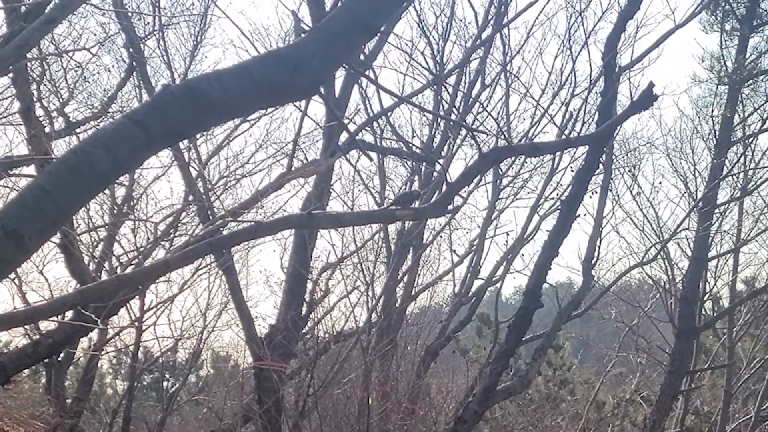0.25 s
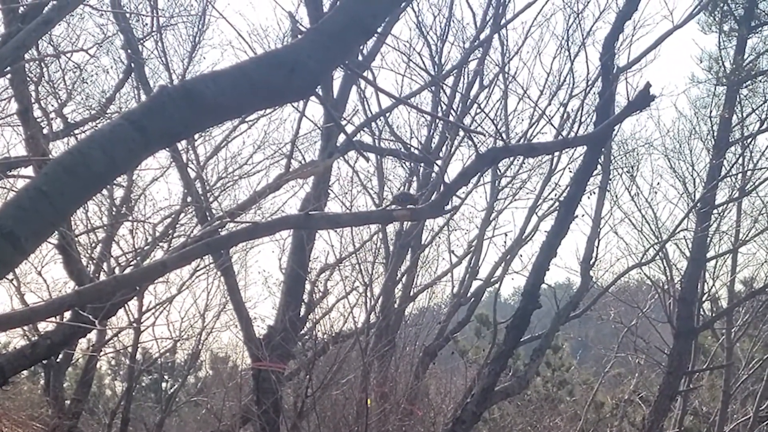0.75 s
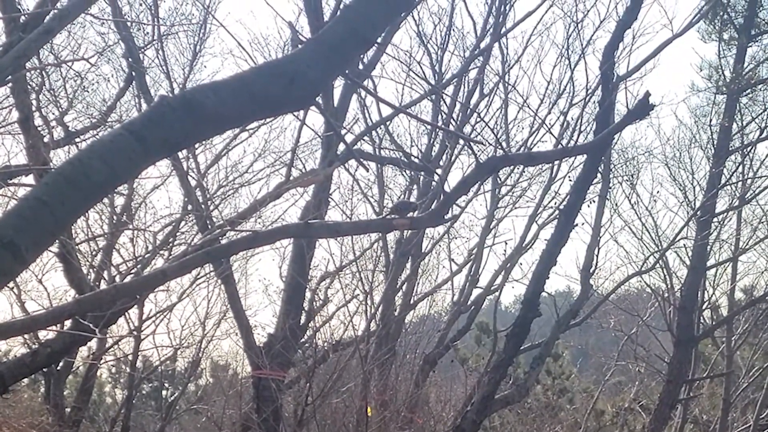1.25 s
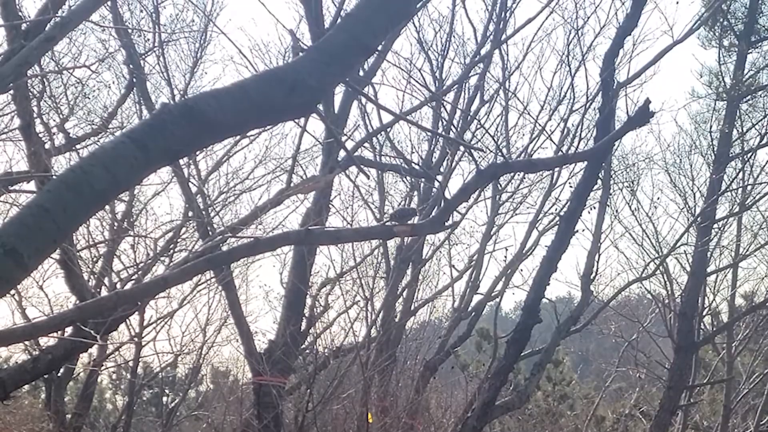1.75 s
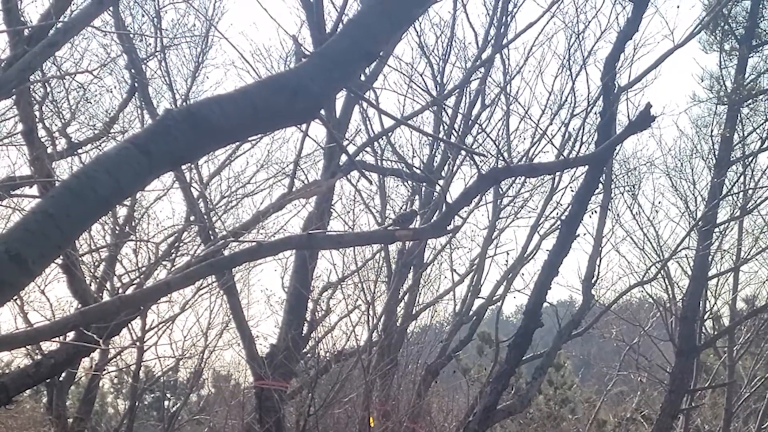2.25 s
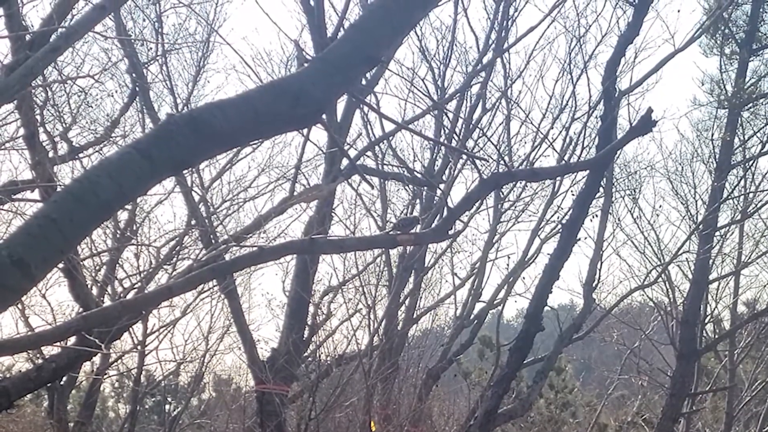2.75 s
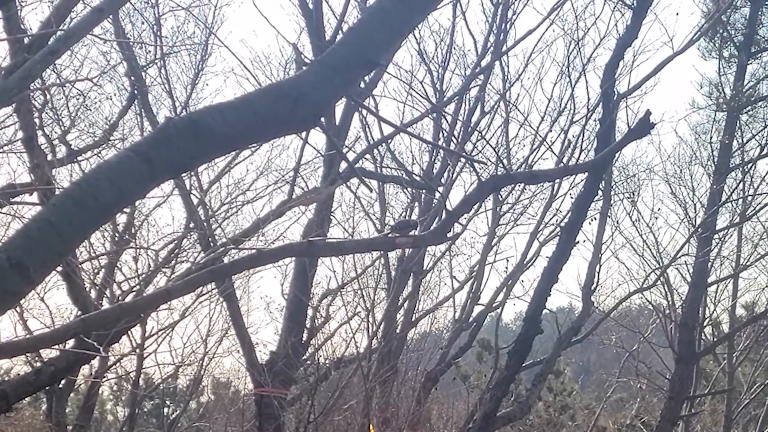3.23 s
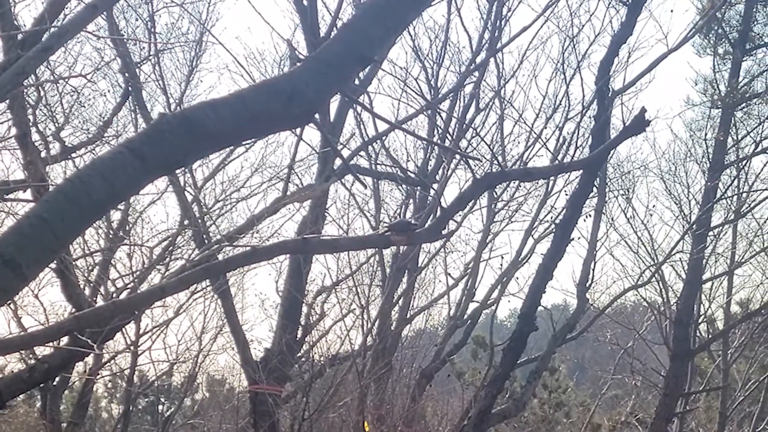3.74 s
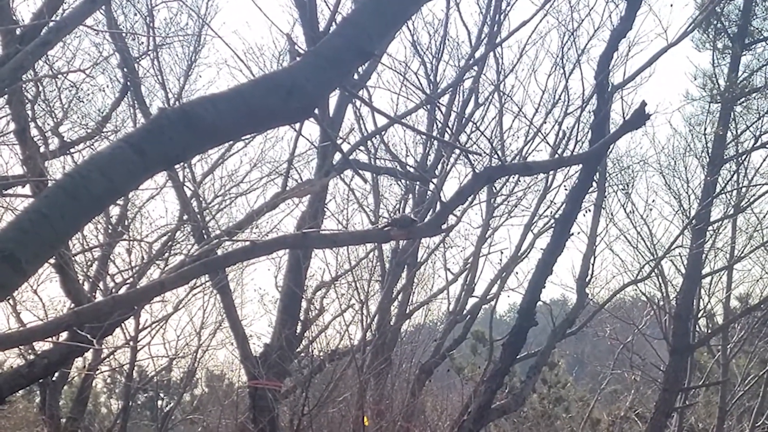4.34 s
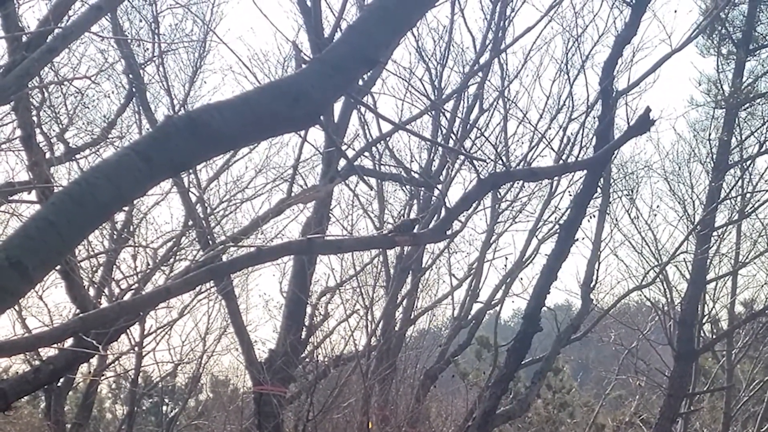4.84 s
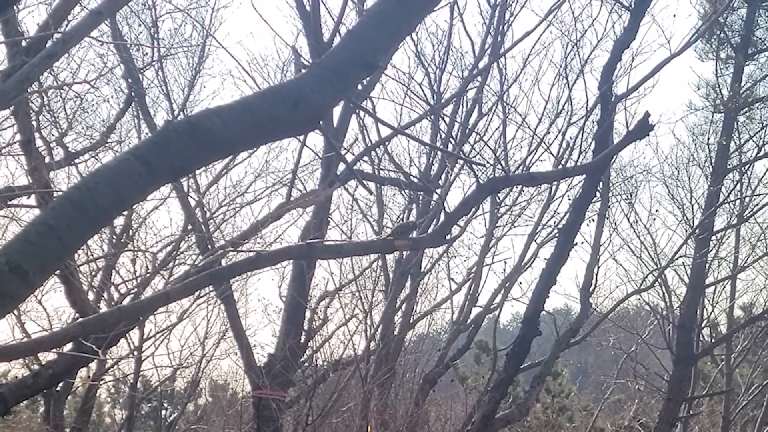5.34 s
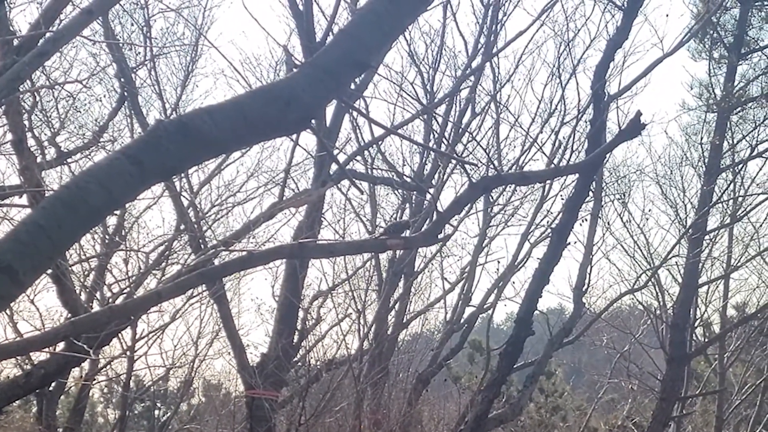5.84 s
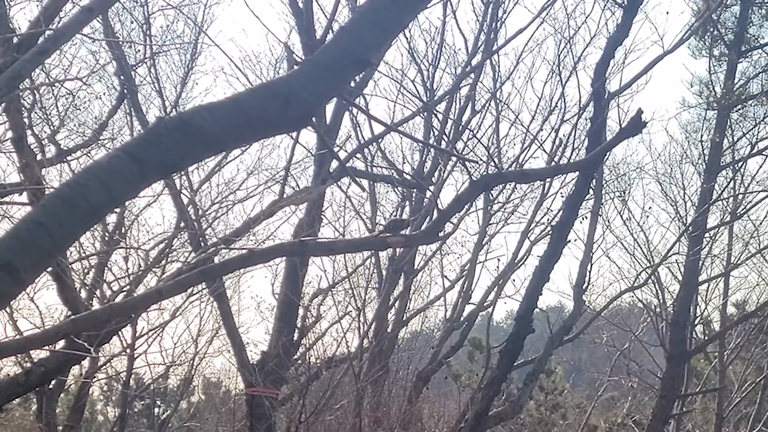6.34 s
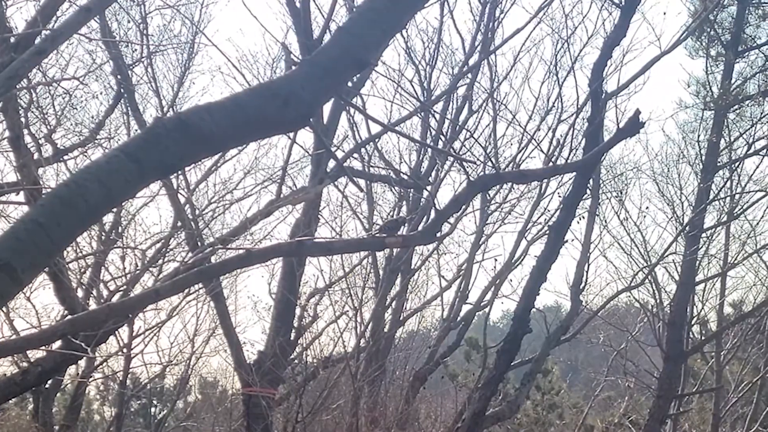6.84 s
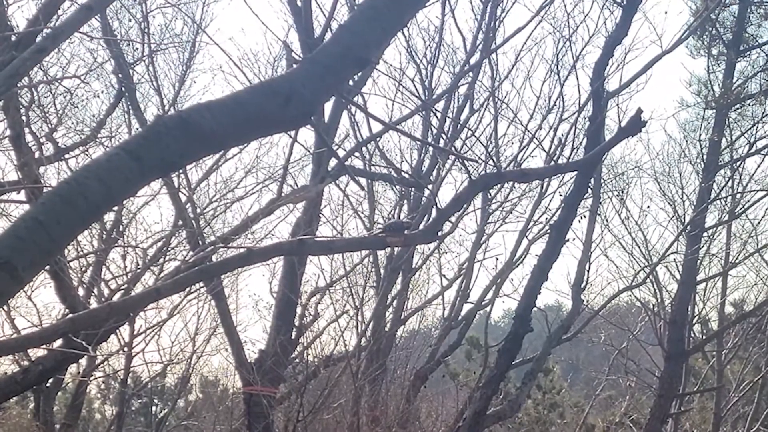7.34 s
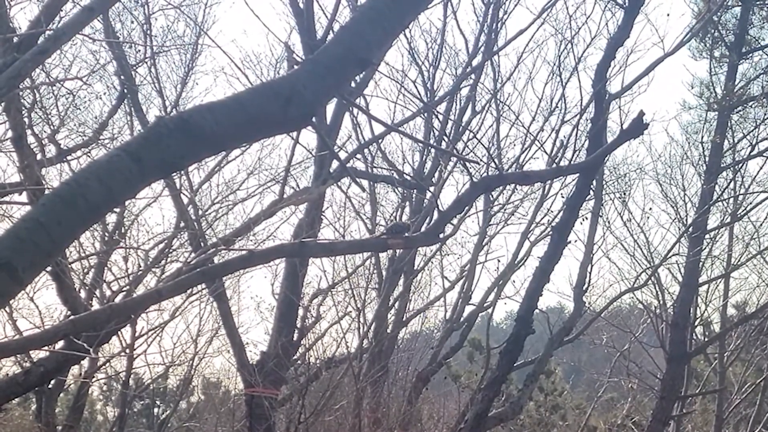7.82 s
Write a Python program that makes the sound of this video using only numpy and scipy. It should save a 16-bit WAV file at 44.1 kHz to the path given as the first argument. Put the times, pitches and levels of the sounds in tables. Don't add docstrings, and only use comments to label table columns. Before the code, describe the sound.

Dry, woody pecks come in little runs among bare trees, with low wind thumps on a hand-held phone and one faint far cheep.

```python
import sys
import numpy as np
from scipy import signal
from scipy.fft import rfft, irfft, next_fast_len
from scipy.io import wavfile
from scipy.ndimage import uniform_filter1d, map_coordinates

SR = 44100
rng = np.random.default_rng(int(sys.argv[2]) if len(sys.argv) > 2 else 0)


def generate_wav(signal):
    frames = np.transpose(np.atleast_2d(signal))
    scaled = np.clip(frames, -1, 1) * 32767
    pcm = np.round(scaled).astype(np.int16)
    wavfile.write(sys.argv[1], SR, pcm)


def gain_from_db(level_db):
    decades = np.asarray(level_db, float) / 20
    return 10 ** decades


N = 356328

BLOW_SIZE = 8192
BLOW_HZ = np.fft.rfftfreq(BLOW_SIZE, 1 / SR)


def unit(x):
    return x / np.sqrt(np.mean(x ** 2, axis=-1, keepdims=True) + 1e-20)


def along(points, hz):
    f, v = np.transpose(points)
    return np.interp(np.log(hz + 1), np.log(f + 1), v)


def curves(rows):
    s, *columns = np.transpose(rows)
    return [np.interp(np.arange(N) / SR, s, column) for column in columns]


def wobble(rate):
    steps = np.arange(0, N + 64, 64)
    knots = rng.standard_normal(int(N * 40 / SR) + 4)
    return np.interp(np.arange(N), steps, map_coordinates(knots, [steps * rate / SR]))


def panned(db):
    return gain_from_db(np.array([db / 2, -db / 2]))


def delayed(s):
    return np.exp(-2j * np.pi * BLOW_HZ * s)


def rush(spectrum, alike, sides, patchy_db=None):
    pair = rng.standard_normal((2, N + 512))
    if patchy_db:
        z = signal.stft(pair, nperseg=512)[2]
        field = uniform_filter1d(rng.standard_normal(z.shape[1:]), size=6, axis=0)
        field = uniform_filter1d(field, size=14, axis=1)
        pair = signal.istft(z * gain_from_db(patchy_db * field / field.std()), nperseg=512)[1]
    m = next_fast_len(N + 8192)
    hz = np.fft.rfftfreq(m, 1 / SR)
    turn = np.arccos(np.clip(along(alike, hz), -1, 1)) / 2
    mid, side = rfft(pair, m) * gain_from_db(along(spectrum, hz)) * [np.cos(turn), np.sin(turn)]
    out = irfft(np.array([mid + side, mid - side]) * panned(along(sides, hz)), m)[:, :N]
    return out / np.sqrt(np.mean(out ** 2))


def pecking():
    moves_s = [2.7, 4.85]
    # (time [s], ring level [dB], then over it: hollow knock [dB], upper ring
    # [dB], bite into the bark [dB])
    taps = [
        (0.152, -51.4, 12.1, 2.8, -6.4),
        (0.266, -38.4, 2.3, -5.6, -6.7),
        (0.5689, -39.8, 3.8, -3.8, -5.7),
        (0.6945, -35.0, 0.5, -2.8, -6.8),
        (0.8213, -34.1, 0.9, 0.7, -6.1),
        (1.2002, -46.2, 5.5, -3.9, -12.4),
        (1.3076, -38.4, 2.2, 1.1, -5.0),
        (1.4352, -38.5, 1.5, 0.5, -5.2),
        (1.6716, -40.4, -2.5, -5.1, -11.1),
        (1.7753, -46.2, -5.6, -2.2, -6.2),
            (3.717, -44.3, 2.9, -4.4, -4.0), (3.8182, -36.8, -1.5, -5.7, -5.5),
                  (3.923, -45.8, 1.6, -1.5, 4.7), (4.1888, -42.6, 2.3, -5.0, -4.1),
                  (4.2894, -37.8, -5.1, -4.1, -8.0), (4.3967, -37.9, -0.4, -0.5, -9.2),
                  (4.62, -53.2, 1.7, -13.4, -14.7), (4.7296, -54.7, -1.3, -11.8, -5.6),
                  (5.0006, -51.2, 5.4, -3.7, -9.9), (5.103, -39.5, 3.3, -2.1, -2.3),
                  (5.229, -40.0, -5.6, 1.7, -0.4), (5.474, -45.6, 6.6, -1.2, -1.7),
                  (5.582, -39.9, -3.0, 3.2, 0.7), (5.692, -50.0, -5.5, -1.1, -1.7),
                  (5.795, -63.0, -0.0, -1.4, -7.2), (6.0782, -50.5, 4.0, -4.5, -9.0),
                  (6.1765, -44.5, 2.3, -4.8, -5.1), (6.2814, -41.4, 4.6, 0.3, -1.0),
                  (6.3961, -40.4, 2.7, 0.4, -1.5), (6.6749, -40.4, -9.3, 4.7, 4.6),
                  (6.9822, -49.2, 5.0, -5.8, -9.1), (7.0863, -44.4, 6.0, 1.2, -0.3),
                  (7.196, -35.4, -7.0, -1.4, -6.2), (7.437, -62.1, 4.0, 3.0, 0.8),
                  (7.5268, -46.6, -10.3, 4.9, -1.6), (7.695, -62.0, 5.0, -11.2, -14.6)]
    # (time [s], lead of the left port [s], splinters over crack [dB])
    perch = [(0, 0.00021, -2), (2, .00019, -1), (3.5, 0.00011, -10.5), (4.5, .0001, -11.5),
             (5, .0001, -5.5), (6.3, 0.000098, -8), (6.7, .0001, -4), (8, 0.000091, -1)]
    crumble_db = -12, -10, -8, -4, -3
    out = np.zeros((2, N + BLOW_SIZE))
    echoes = nearby_copies()
    perch_s, leads, splinters_db = np.transpose(perch)
    push = delayed(0.000583) / (1 + 1j * BLOW_HZ / 7500) ** 2
    for s, db, knock_db, upper_db, bite_db in taps:
        spot = np.searchsorted(moves_s, s)
        splinter_db = bite_db + np.interp(s, perch_s, splinters_db)
        group_db = knock_db, 0, upper_db, bite_db, splinter_db
        crushed = crushed_bark()
        blow, spread = 0, 0
        for (modes, blurred), rel_db, rough_db in zip(branch_groups(spot), group_db, crumble_db):
            part = (push + gain_from_db(rough_db) * crushed) * modes
            blow = blow + gain_from_db(db + rel_db + 66) * part / np.linalg.norm(part)
            spread = spread + gain_from_db(db + rel_db + 51.5) * blurred / np.linalg.norm(blurred)
        ports = [delayed(0), delayed(np.interp(s, perch_s, leads))]
        heard = irfft(blow * ports * (1 + echoes[spot]), BLOW_SIZE)
        start = round((s - 0.0008) * SR)
        out[:, start:start + BLOW_SIZE] += heard + scattered(spread * delayed(0.006))
        lead_in = rfft(rng.standard_normal((2, 600)) * np.hanning(600), BLOW_SIZE)
        start = round((s - 0.012) * SR)
        out[:, start:start + BLOW_SIZE] += gain_from_db(-41 + 3 * rng.standard_normal()) * irfft(lead_in * spread, BLOW_SIZE)
    return out[:, :N]


def branch_groups(spot):
    # (frequency [Hz], width [Hz], left and right level [dB]
    wood = [(1232, 70, 12.0, 8.0, 13.0, 9.0, 11.0, 8.0), (1513, 70, -1.0, 2.0, -1.0, -2.0, -2.0, -2.0),
            (1608, 70, 2.0, 3.0, 6.0, 2.0, 2.0, 1.0), (1772, 70, -10.0, -16.0, -13.0, -14.0, -7.0, -14.0),
            (2241, 104, -14.0, 4.0, 0.0, 6.0, -8.0, 2.0), (2537, 70, -14.0, 2.0, -17.0, -8.0, -5.0, -0.0),
            (2780, 166, -3.0, 6.0, -7.0, -1.0, -6.0, -1.0), (3102, 83, -10.0, 0.0, -2.0, 0.0, -2.0, -6.0),
            (3412, 147, -9.0, -8.0, -6.0, -9.0, -6.0, -7.0),
            (3744, 147, -1.0, -2.0, -3.0, -8.0, -2.0, -6.0), (4015, 96, -4.0, -2.0, -2.0, -1.0, -2.0, -3.0),
            (4344, 400, -2.0, -4.0, -3.0, -5.0, -2.0, -3.0),
            (4556, 285, -7.0, -7.0, -10.0, 2.0, -11.0, 3.0),
            (4960, 400, -3.0, -8.0, -5.0, -5.0, -6.0, -2.0)]
    # (frequency [Hz], width [Hz], left and right level [dB]
    # at the first spot, left and right level [dB] at the second)
    loose_bark = [(5220, 480, -9, -5, -4, 5), (5940, 340, -15, -7, -12.5, 0.5), (6260, 270, -2, -6, 6, 2),
                  (7180, 250, -3, -7, -6.5, -7.5), (7860, 300, -11, -9.5, -16, -15),
                  (8980, 310, -3, 4, -11, -12), (9160, 360, 1, 6, -11, 0), (9900, 620, 0, 11, -3, 1),
                  (10640, 620, -5, 1, -9, 3.5), (11480, 460, -7, 0, -6.5, -6), (12060, 880, -9, 2, -6, -8),
                  (13400, 620, -10, -18, -8, -5), (14600, 730, -16, -21, -26, -13),
                  (15500, 730, -28, -31, -27, -20)]
    group_edges_hz = [1950, 3250, 4700, 8200]
    node_width_hz = 367, 10, 360
    f = BLOW_HZ
    branch = wood + [row + row[-2:] for row in loose_bark]
    centre, width, *port_db = np.transpose(branch)[:, :, None]
    group = np.searchsorted(group_edges_hz, centre[:, 0])
    sign = (-1.) ** (np.arange(len(branch)) + (group > 0))[:, None]

    def ring(c, w):
        return sign * 1j * f * w / (c * c - f * f + 1j * f * w)

    no_bass = (1j * f / (1000 + 1j * f)) ** 2
    node = 1 - 1j * f * node_width_hz[spot] / (1960 ** 2 - f * f + 1j * f * 380)
    thin = no_bass * node
    pitch_luck, level_luck = rng.standard_normal((2, len(branch), 1))
    gains = gain_from_db(np.array(port_db[2 * spot:2 * spot + 2]) + 1.8 * level_luck)
    modes = gains * ring(centre * (1 + 0.003 * pitch_luck), width) * thin
    blurred = gains.mean(0) * ring(centre, 4.5 * width) * thin
    return [(modes[:, group == g].sum(1), blurred[group == g].sum(0)) for g in range(5)]


def crushed_bark():
    t = np.arange(BLOW_SIZE) / SR
    burst = rng.standard_normal((3, BLOW_SIZE)) * gain_from_db(-60 * t / 0.0096) * (1 - np.exp(-t / 0.0011)) ** 2
    return rfft(burst[0] + 0.5 * burst[1:]) * 1j * BLOW_HZ / (5000 + 1j * BLOW_HZ)


def nearby_copies():
    # (delay [s], left level [dB], right level [dB])
    early = [(.0012, -22, -11.5), (.0021, -15, -13.5), (.0033, -24, -20), (.0051, -30, -17),
             (.0089, -23, -16), (0.0108, -22, -18), (0.012, -21, -30)]
    # (delay [s], left level [dB], right level [dB])
    ground_copies = [(.0073, -9, -10), (.0064, -8, -11), (.00641, -7.5, -10)]

    def copy(s, left_db, right_db):
        return gain_from_db(np.array([[left_db], [right_db]])) * delayed(s) / (1 + 1j * BLOW_HZ * s / 70)

    return [sum(copy(*row) for row in early + [ground]) for ground in ground_copies]


def scattered(spectrum):
    # (frequency [Hz], time to fall 60 dB [s])
    trunks = [(800, 0.038), (2500, 0.19), (6000, 0.16), (10000, 0.17), (15000, 0.15)]
    hz, t, z = signal.stft(rng.standard_normal((2, BLOW_SIZE - 1024)), SR, nperseg=256)
    tail = signal.istft(z * gain_from_db(-60 * t / along(trunks, hz)[:, None]), SR, nperseg=256)[1]
    return irfft(spectrum * rfft(tail / np.linalg.norm(tail[0]), BLOW_SIZE), BLOW_SIZE)


def ticks():
    # (time [s], peak level [dB], left-right difference [dB])
    crumbs = [(0.173, -62, -11), (1.3853, -58, -6), (1.951, -66, -2.0), (2.2094, -73, -0.5),
              (2.2593, -70, 3.0), (2.4857, -68, -1.0), (2.9157, -72, 3.0), (3.5603, -66, 6),
              (3.6252, -72, -0.5), (4.538, -66, 1.1), (5.4345, -67, 1.0), (7.6594, -71, 0.5)]
    out, t = np.zeros((2, N + 512)), np.arange(512) / SR
    band = signal.butter(2, [7500, 12000], "bandpass", fs=SR, output="sos")
    for s, db, side_db in crumbs:
        click = signal.sosfilt(band, rng.standard_normal(len(t)) * gain_from_db(-60 * t / 0.0071))
        start = round(s * SR)
        out[:, start:start + len(t)] += gain_from_db(db) * panned(side_db)[:, None] * click / np.abs(click).max()
    return out[:, :N]


def cheep():
    # (time [s], frequency [Hz], level [dB])
    note = [
        (1.63, 3250, -95),
        (1.64, 3240, -71),
        (1.666, 3170, -79),
        (1.676, 2940, -50),
        (1.686, 2524, -52),
        (1.698, 2395, -59),
        (1.712, 2460, -71),
        (1.722, 2480, -92),
    ]
    pulses_hz, rough_db = 85, 5
    hz, db = curves(note)
    trill = (1 + np.cos(2 * np.pi * pulses_hz * (np.arange(N) / SR - 1.684))) / 2
    hoarse_db = rough_db * unit(uniform_filter1d(rng.standard_normal(N), size=150))
    tone = np.sin(2 * np.pi * np.cumsum(hz) / SR)
    return panned(-1.8)[:, None] * gain_from_db(db + 2.5 + hoarse_db) * (0.25 + trill) * tone


def swells(rows, pan_share):
    rise_over_fall = 0.73
    steps = np.arange(0, N + 64, 64)
    s, fall_s, db, side_db = np.transpose(rows)[:, :, None]
    away = steps / SR - s
    drop_db = 10 * np.maximum(away, -away / rise_over_fall) / fall_s
    power = (panned(pan_share * side_db) * gain_from_db(db - drop_db)) ** 2
    return np.array([np.interp(np.arange(N), steps, port.sum(0)) for port in power])


def thumps():
    # (time [s], peak level [dB], frequency [Hz], left-right difference [dB])
    pushes = [
        (0.0414, -16.5, 71.5, 3),
        (0.043, -30, 190, 1.1),
        (6.638, -18, 77, -1),
        (6.628, -26, 190, .3),
        (7.165, -24, 110, 1.5),
        (6.805, -29, 90, 0),
        (6.84, -27, 85, 0),
        (7.065, -28, 95, 0),
        (7.258, -29, 105, 0),
    ]
    out, t = np.zeros((2, N)), np.arange(N) / SR
    for s, db, hz, side_db in pushes:
        cycles = (t - s) * hz
        pulse = -np.cos(2 * np.pi * cycles) * np.exp(-(cycles / 0.5) ** 2)
        out += gain_from_db(db) * panned(side_db)[:, None] * pulse
    return out


def wind():
    # (time [s], strength [dB])
    breeze = [(0, -47.5), (1, -48), (3, -48), (4.9, -48.5), (5.45, -51.5), (6.3, -51.5), (6.6, -46),
              (6.95, -40), (7.18, -46), (7.3, -51), (8.08, -50.5)]
    # (time [s], time to fall 10 dB [s], slow buffet [dB], faster buffet over it [dB],
    # left-right difference [dB])
    strong = [(0.04, 0.04, -29.5, -5.5, -10), (0.2, 0.08, -31, -13, 10), (0.54, 0.16, -34.5, -5.5, 10),
              (0.74, .03, -43, 6.5, 11), (0.94, 0.08, -35.5, -3.5, 5), (2.09, 0.2, -39, -4.5, -2),
              (2.65, 0.2, -41, -3, 2), (3.4, 0.15, -37, -10.5, 17), (3.96, 0.1, -44.5, 0.5, 4),
              (4.66, .06, -45.5, 4, -4), (5.04, 0.09, -39, -0.2, -22), (5.145, 0, -41, 3, 15),
              (5.22, .05, -43.5, 7, -9), (5.6, 0.05, -38, 4, -13), (5.67, 0.09, -36, -0.5, 7),
              (6.165, .05, -38, 2, -4), (6.41, 0.07, -38, -8, -14), (6.62, .07, -31.5, -1, 1),
              (6.82, .06, -37, 1, 1), (7.02, .06, -42, 8.5, 10), (7.16, 0.0653, -37, 11, -2),
              (7.28, 0.06, -40, 4, 12)]
    # (time [s], level [dB], left-right difference [dB])
    puffs = [(1.06, -34.5, 14), (1.28, -41, 18), (1.39, -41.5, -8), (1.55, -42.5, -3), (1.75, -41, -3),
             (1.91, -37.5, -7), (2.45, -42, -4), (3.05, -48, -2.1), (3.6, -39, 3), (4.32, -46, 17),
             (4.5, -42, 4), (4.77, -41, -8), (4.95, -36, -14), (5.3, -42, 0), (5.96, -43, 4),
             (6.48, -44, -6), (7.76, -38, -16), (7.92, -40, -11), (8.03, -36, -9)]
    # (frequency [Hz], density [dB per Hz])
    slow_spectrum = [(12, -44), (22, -14), (45, -0.5), (62, 4.5), (78, -2), (110, -35.5), (200, -64.5),
                     (400, -130)]
    # (frequency [Hz], density [dB per Hz])
    faster_spectrum = [(40, -40), (65, -7.5), (85, 5.5), (105, -2), (135, -8.5), (190, -20.5), (300, -63.5),
                       (600, -130)]
    # (frequency [Hz], density [dB per Hz])
    flutter_spectrum = [(60, -30), (120, 6), (180, 7), (260, -0.5), (400, -9.5), (700, -39), (1500, -130)]
    puff_s, puff_faster_db = 0.062, -12.5
    calm_slow_db, calm_faster_db, calm_flutter_db = -1, -0.25, -0.3
    gust_flutter_db = -7.5
    breeze_db, = curves(breeze)
    gusts = strong + [(s, puff_s, db, puff_faster_db, side_db) for s, db, side_db in puffs]
    heavy = [(s, fall_s, db, side_db) for s, fall_s, db, faster_db, side_db in gusts]
    quick = [(s, fall_s, db + faster_db, side_db) for s, fall_s, db, faster_db, side_db in gusts]

    def strength(calm_db, power):
        return np.sqrt(gain_from_db(breeze_db + calm_db) ** 2 + power)

    def lumps(depth_db):
        return gain_from_db(depth_db * np.array([wobble(24), wobble(16)]))

    slow = unit(lumps(0.31) * rush(slow_spectrum, [(30, 0.35)], [(30, -0.3)]))
    faster = unit(lumps(0.97) * rush(faster_spectrum, [(90, 0.55)], [(90, 0.1)]))
    flutter = unit(lumps(4) * rush(flutter_spectrum, [(120, 0.65), (300, 0.7)], [(120, -0.48), (300, -1.7)]))
    out = strength(calm_slow_db, swells(heavy, 0.44)) * slow
    out += strength(calm_faster_db, swells(quick, 0.5)) * faster
    out *= gain_from_db(2.5)
    out += strength(calm_flutter_db, gain_from_db(gust_flutter_db) ** 2 * swells(quick, 0.69)) * flutter
    return out + thumps()


def distance():
    # (time [s], level [dB])
    far = [(0.0, -53.5), (2.4, -53.5), (4.05, -54.5), (4.79, -53.5), (5.15, -56.5), (5.92, -56),
           (6.21, -52.5), (6.75, -57.5), (7.79, -53.5), (8.08, -53.5)]
    # (time [s], hiss level [dB], twig whine level [dB])
    air = [(0, -66.5, -82), (2.5, -70.5, -86), (3.6, -69, -83), (5, -70, -82), (6.3, -65, -80),
           (8.08, -67.5, -77.5)]
    # (frequency [Hz], density [dB per Hz])
    roar_spectrum = [(120, -40), (200, -8.5), (227, -1.5), (265, -5.5), (425, -8.5), (528, -11.5),
                     (780, -14.5), (1240, -21.5), (1750, -25), (2280, -68), (3850, -120)]
    # (frequency [Hz], density [dB per Hz])
    hiss_spectrum = [(1000, -33), (1700, -13), (1950, -4), (2400, -9), (3300, -12), (4400, -16.5),
                     (5200, -21.5), (7000, -21), (9500, -23.5), (11500, -25), (12500, -28), (15000, -34),
                     (16000, -37), (16600, -87)]
    # (frequency [Hz], density [dB per Hz])
    whine_spectrum = [(6000, -38), (7100, -1), (7500, 9), (7850, 5), (8200, 2), (9200, -33)]
    # (frequency [Hz], correlation [-1 to 1])
    alike = [(60, 0.83), (130, 0.66), (290, 0.95), (640, 0.51), (1410, -0.55), (3100, 0.23), (6820, -0.071),
             (15000, -0.086)]
    # (frequency [Hz], left-right difference [dB])
    sides = [(60, 0), (110, 21), (200, -2.5), (380, -2.0), (700, -2.5), (1290, -5), (2380, -7), (4400, -7),
             (8120, 0), (15000, -6)]
    roar_db, = curves(far)
    hiss_db, whine_db = curves(air)
    roar = gain_from_db(roar_db + 5 + 0.8 * wobble(2.63)) * rush(roar_spectrum, alike, sides, patchy_db=1.33)
    hiss = gain_from_db(hiss_db + 0.1 * wobble(0.89)) * rush(hiss_spectrum, alike, sides, patchy_db=-1.0)
    whine = rush(whine_spectrum, [(7700, 0.078)], [(7700, 16)], patchy_db=1.5)
    return roar + hiss + gain_from_db(whine_db + 0.69 * wobble(2.06)) * whine


def scene():
    return pecking() + ticks() + cheep() + wind() + distance()


def roll_off(x):
    return signal.sosfilt(signal.butter(12, 16500, fs=SR, output="sos"), x)


def record(dry):
    # (frequency [Hz], over the band's quiet level [dB])
    gate = [(8500, -6), (11500, -2.6), (12300, -.4), (15500, .4)]
    top_hz = 15900
    hz, _, z = signal.stft(dry, SR, nperseg=1024)
    hz = hz[:, None]
    power = uniform_filter1d(np.mean(np.abs(z) ** 2, 0), size=12, axis=0)
    power = uniform_filter1d(power, size=2, axis=1)
    soft = np.minimum(power, np.percentile(power, 60, axis=1, keepdims=True))
    quiet = np.exp(uniform_filter1d(np.log(soft + 1e-30), size=90, axis=1))
    kept = (hz < gate[0][0]) | (power > gain_from_db(along(gate, hz)) ** 2 * quiet)
    z = z * kept / np.sqrt(1 + (hz / top_hz) ** 120)
    mix = signal.istft(z, SR, nperseg=1024)[1][:, :N]
    return roll_off(mix)


dry = scene()
out = record(dry)
generate_wav(out)
```